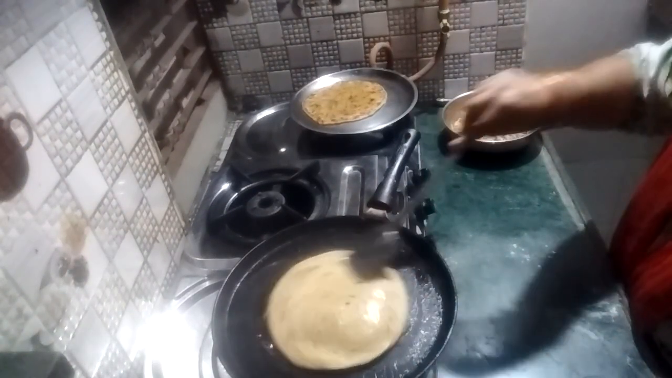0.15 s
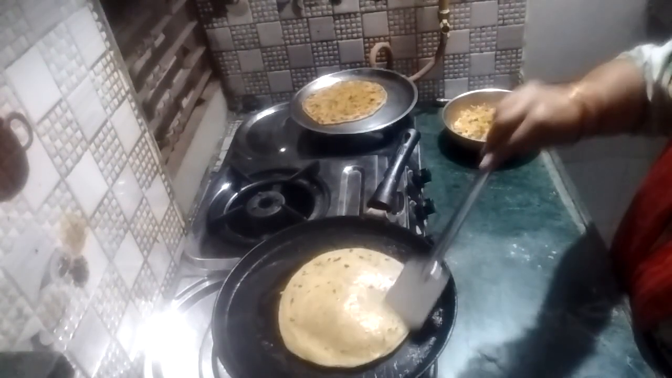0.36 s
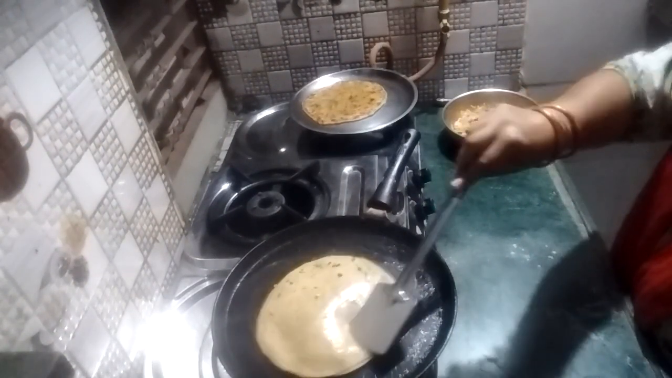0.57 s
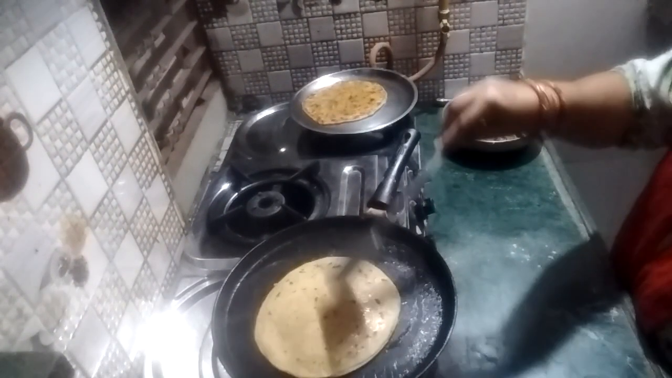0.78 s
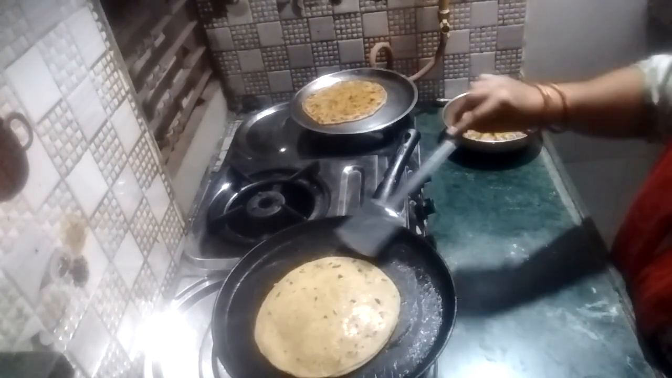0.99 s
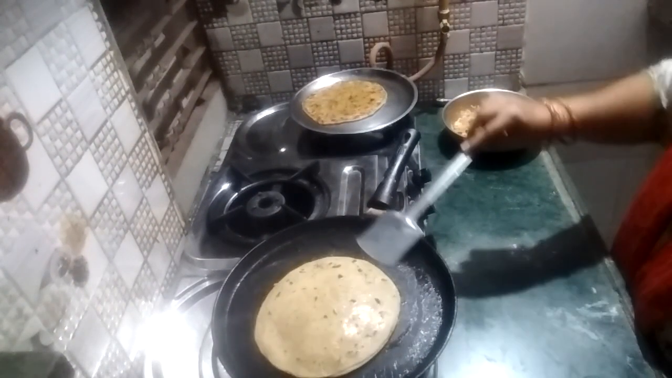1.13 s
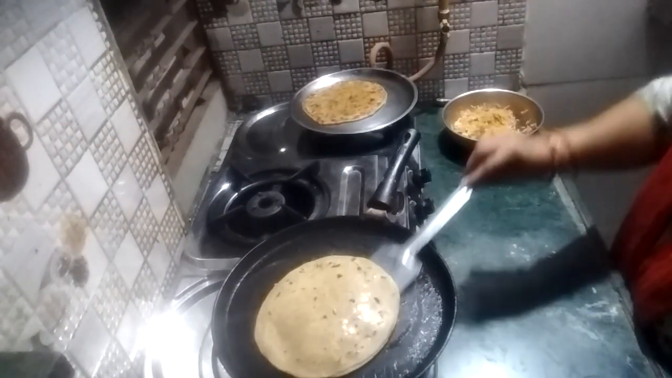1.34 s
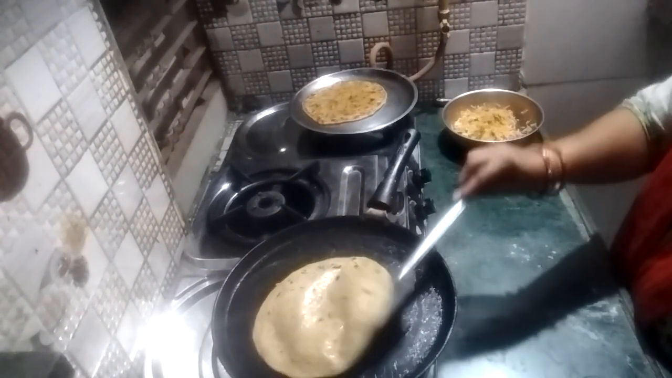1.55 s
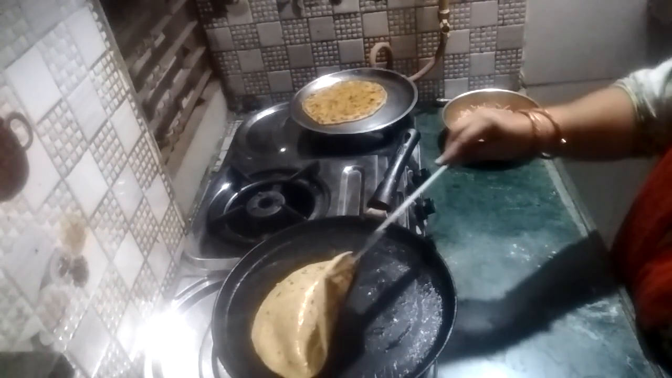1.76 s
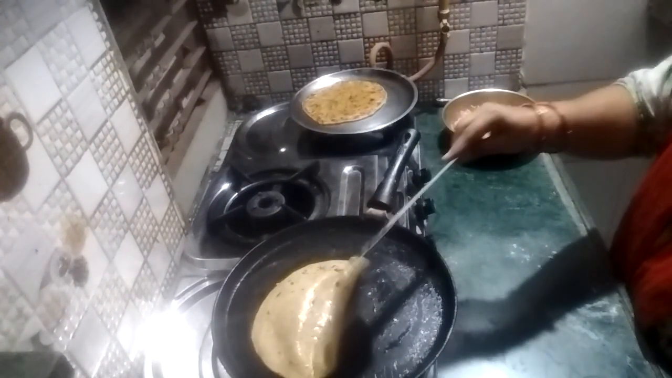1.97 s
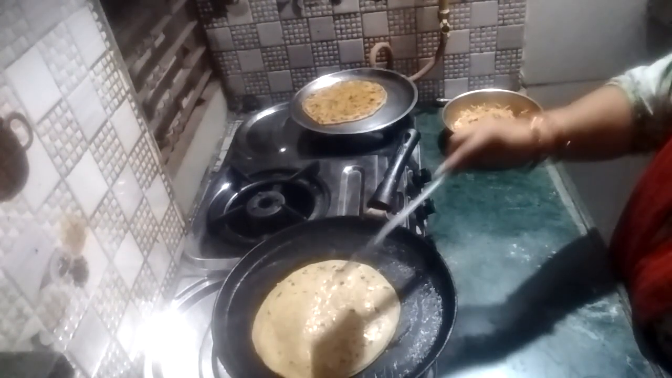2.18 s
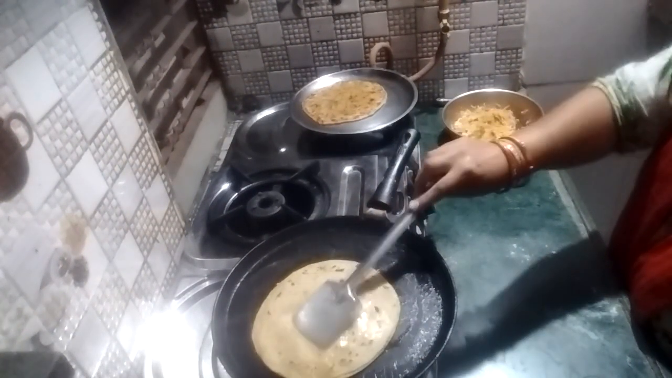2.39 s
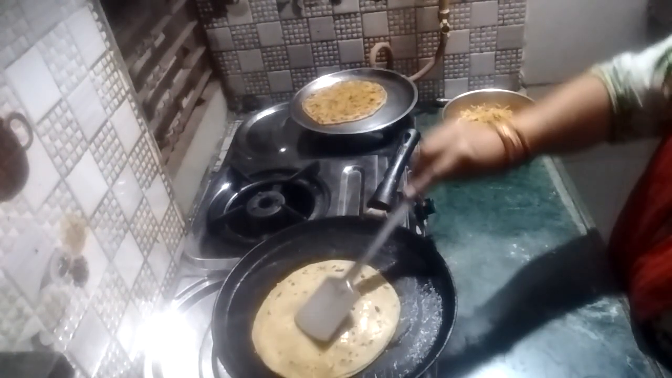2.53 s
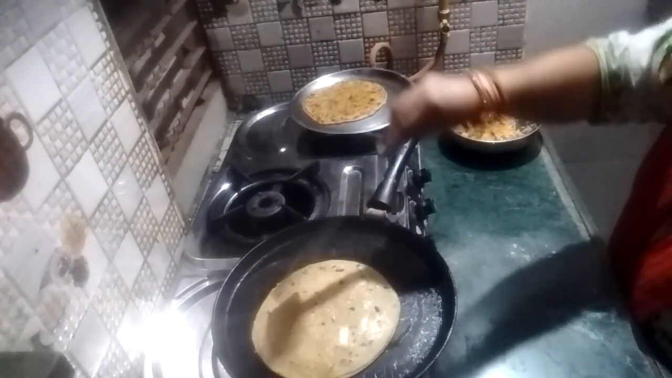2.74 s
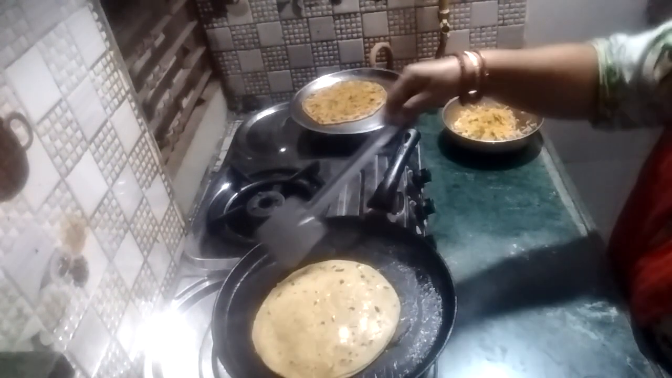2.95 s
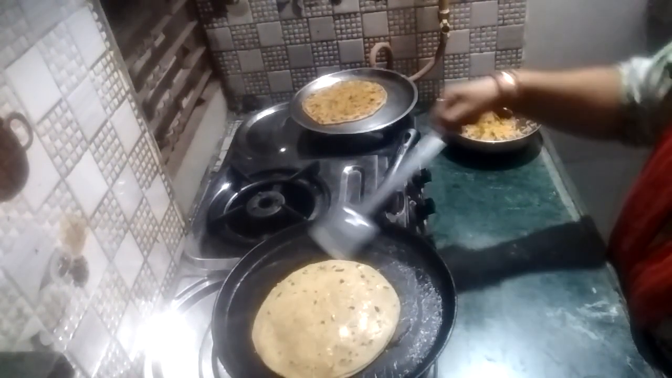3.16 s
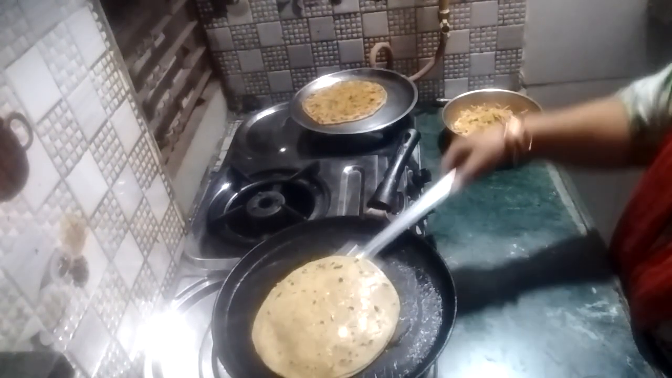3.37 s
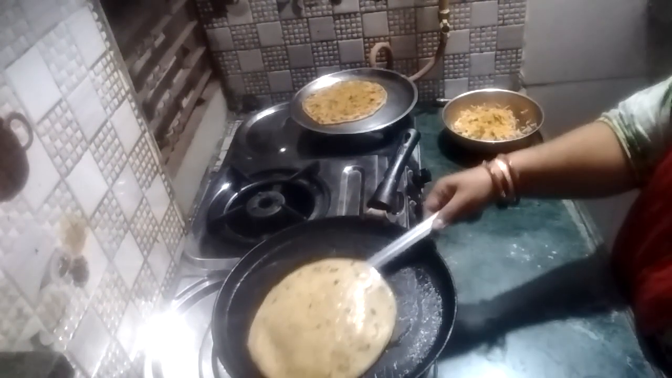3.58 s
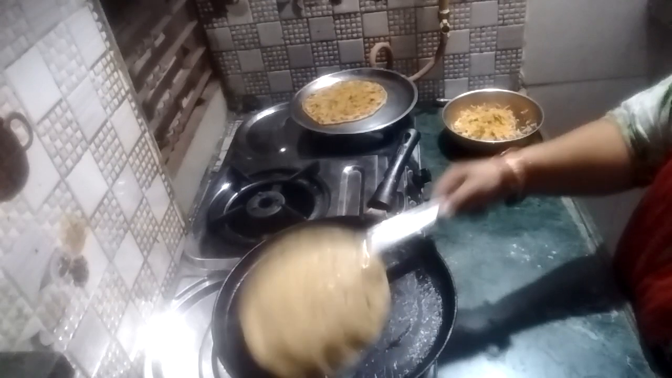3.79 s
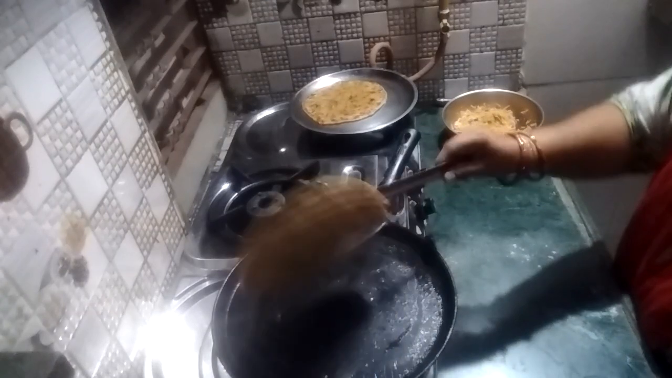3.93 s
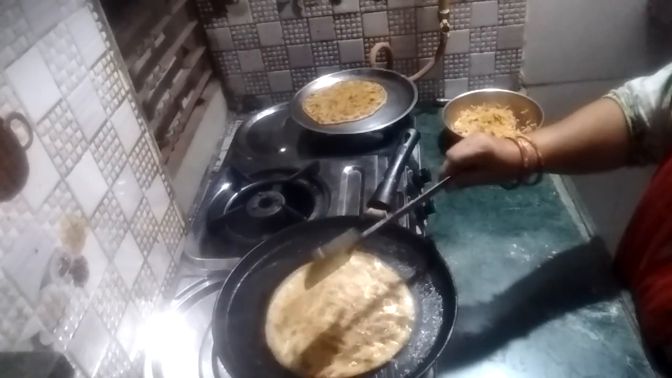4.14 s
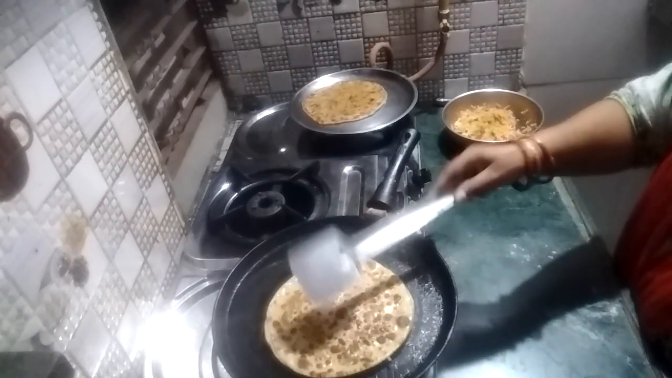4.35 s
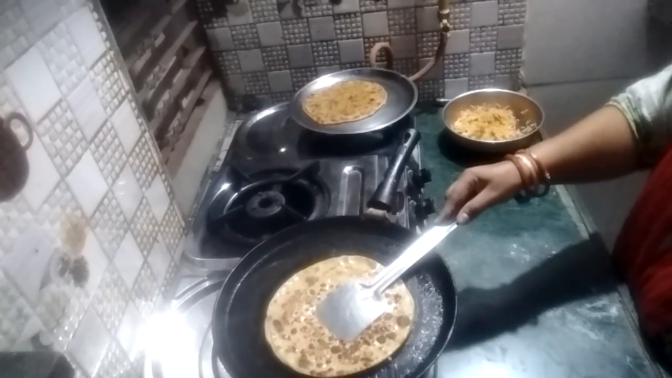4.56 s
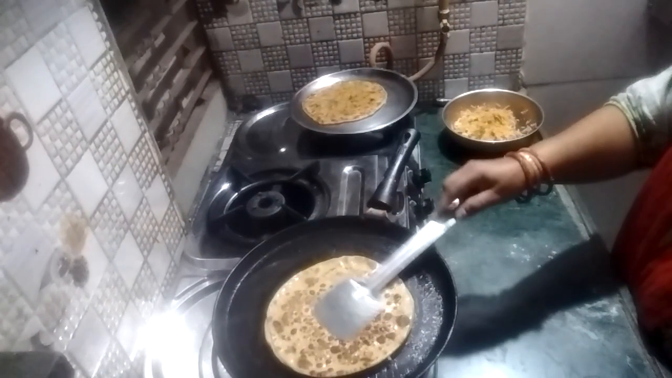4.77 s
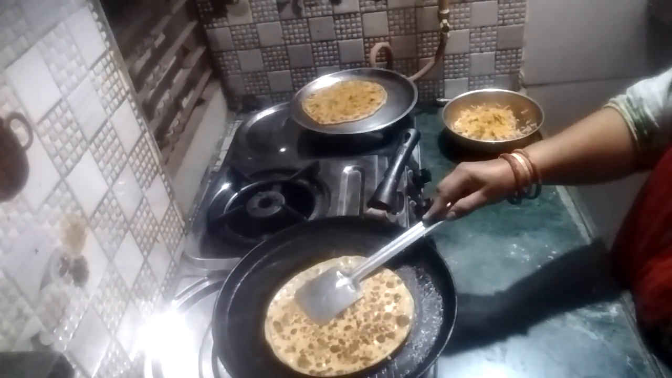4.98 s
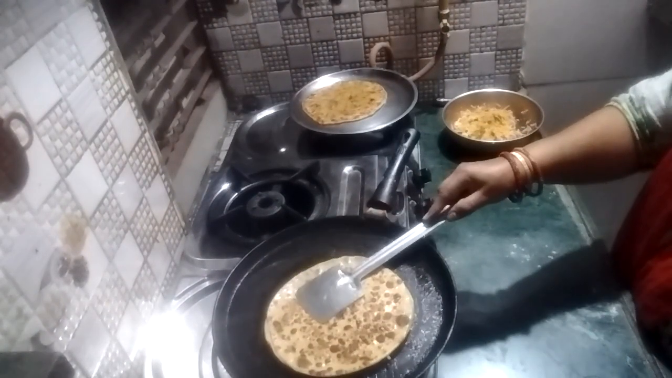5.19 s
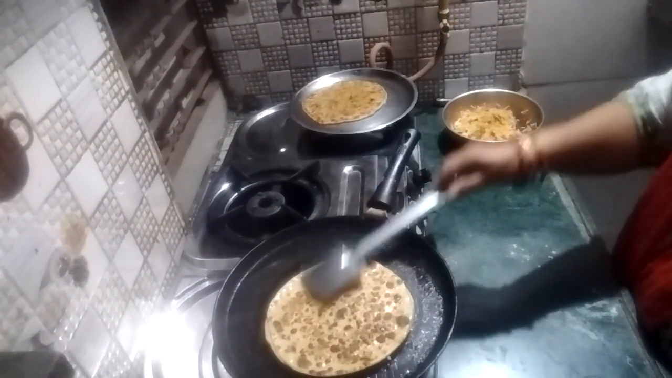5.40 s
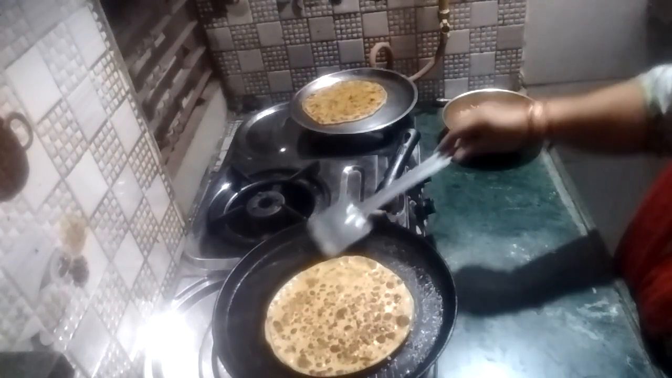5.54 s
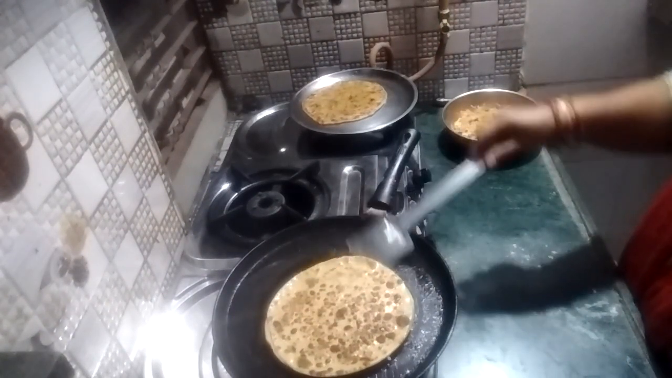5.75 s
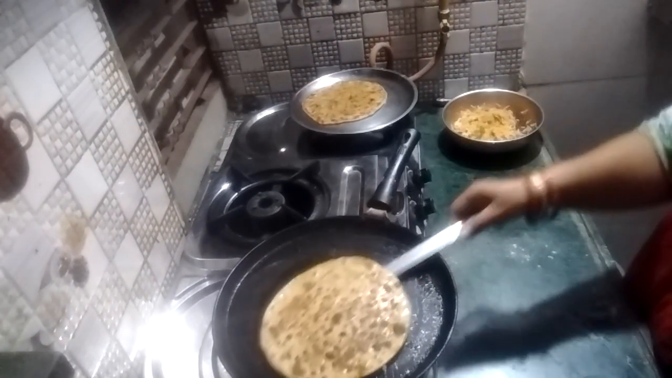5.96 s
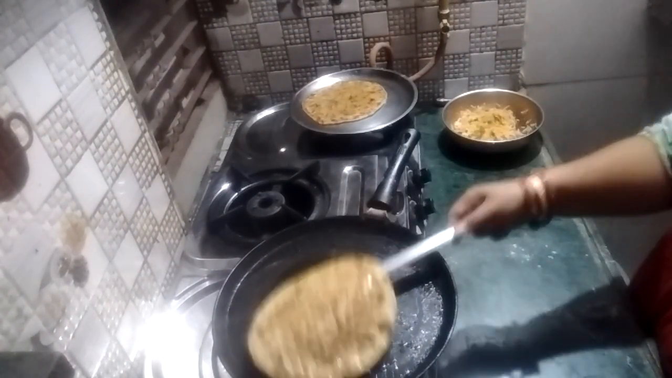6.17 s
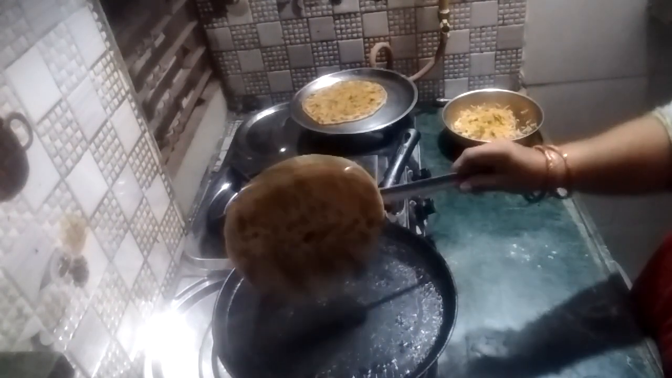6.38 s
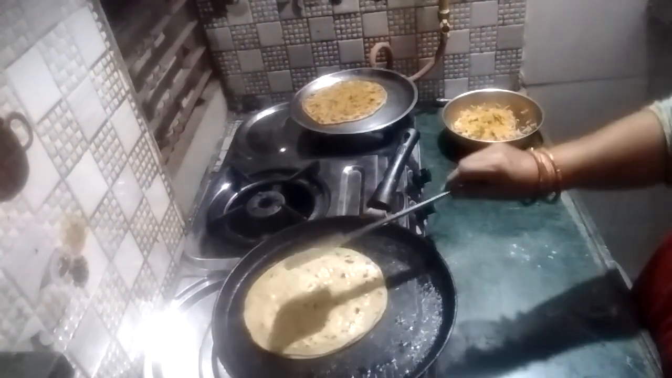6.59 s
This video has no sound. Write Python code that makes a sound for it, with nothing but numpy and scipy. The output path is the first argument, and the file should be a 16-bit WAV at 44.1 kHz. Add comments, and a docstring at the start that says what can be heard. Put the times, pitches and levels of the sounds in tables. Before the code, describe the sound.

Close mono pickup of a griddle in a hard-walled kitchen: thin, high oil crackle over a faint gas rush. Steel taps brightly, rubs with a gliding metallic rasp, and dough drops back with a dull smack and loud oil tick. A big bright sizzle swells midway, then the flipped bread slaps down, fries harder and is patted softly. Final light knocks and scrapes end in near quiet.

```python
"""Oil sizzles and steel knocks lightly: a flatbread fries on a griddle over a gas ring in a tiled kitchen.
A spatula knocks (decaying modes plus noise), scrapes and hums (driven resonances), slides under the bread,
flips it and pats it down (noise smacks, hollow thuds, a low stove thump).
Oil and steam are coloured random clicks that swell with each squeeze and flare at set contacts; drops pop.
The gas flame is a low rush of coloured noise."""
import sys
import numpy as np
from scipy import signal
from scipy.fft import rfft, irfft, next_fast_len
from scipy.io import wavfile

SR = 44100
rng = np.random.default_rng(int(sys.argv[2]) if len(sys.argv) > 2 else 0)


def pcm_store(signal):
    """Save signal as 16-bit PCM."""
    levels = np.round(np.clip(np.atleast_2d(signal), -1, 1) * 32767)
    wavfile.write(sys.argv[1], SR, levels.astype(np.int16).T)


N = 291942
TIME = np.arange(N) / SR

# blade pressing or shifting the bread: start_s, rise_s, hold_s, t60_s, oil_db, steam_db
SQUEEZES = [(0.0, 0.034, 0.0089, 0.47, -51.5, -63), (-.1, 0.13, 0.34, 0.44, -58, -62.5),
            (0.13, 0.12, 0.049, .3, -74, -54.5), (0.493, 0.065, 0.031, .5, -53.5, -63),
            (1.21, 0.32, 0.046, .3, -51, -53.5), (1.544, 0.11, 0.12, 1.6, -50.5, -74),
            (3.25, 0.091, 0.28, .6, -52.5, -56.5), (3.497, 0.15, 0.017, 0.3, -22.5, -60),
            (3.628, 0.091, 0.079, 0.35, -31, -47.5), (3.803, 0.083, .3, 0.17, -58, -87),
            (4.285, 0.044, 0.55, 1.3, -61, -53.5), (4.61, 0.019, 0.018, 0.91, -49.5, -49.5),
            (4.933, 0.02, 0.089, 0.82, -68, -56), (5.447, 0.15, .03, 0.29, -60, -60.5),
            (5.733, 0.042, 0.27, 0.9, -61, -52.5)]
# oil flaring on contact: start_s, level_db, hold_s, t60_s, bubble_pitch_hz
FLARES = [(1.182, -30.5, 0.025, 0.31, 11300), (1.924, -48.5, .012, 0.14, 12000),
          (2.215, -35, 0.03, 0.078, 11100), (2.239, -29, .02, 0.38, 11770), (2.559, -38, 0.014, 0.2, 12400),
          (3.24, -29, 0.037, 0.22, 11000), (3.325, -40, 0.017, 0.057, 12800),
          (4.207, -26.5, 0.019, 0.28, 11300), (4.251, -35, 0.091, 0.3, 11400)]
# single oil drops bursting: start_s, level_db
POPS = [(1.924, -34), (2.285, -14), (3.016, -39), (4.2557, -16), (4.385, -21.5)]
# steel on the griddle: start_s, griddle_db, blade_db, clatter_db, brightness_hz, ring_time_share (left by bread)
KNOCKS = [(0.03, -84, -74, -59.5, 14000, 1), (0.547, -89, -78, -58.5, 11000, 1),
          (1.186, -42, -26.5, -34.5, 15500, 1), (3.244, -31, -44, -34.5, 14000, 1),
          (4.212, -56, -46, -33, 11000, 0.75), (4.747, -42, -62, -31, 2460, 0.58),
          (5.74, -39.5, -47, -40, 12000, 1), (5.755, -41, -46, -42, 11000, 1),
          (5.935, -72, -55, -34, 4600, 0.35)]
# blade strokes, focused on bare metal, broad over bread: start_s, rise_s, hold_s, t60_s, friction_db (untrimmed),
# pitch_hz, glide_hz_per_s, spread_share (of pitch), boost_db
STROKES = [(.08, 0.21, 0.021, 0.39, -50.5, 800, 97, 0.093, -9),
           (0.588, 0.026, .01, .45, -56, 900, 6, .3, 2), (1.221, .19, 0.046, 0.94, -45, 2727, 2, 0.1, 2.5),
           (1.357, 0.065, 0.062, 0.12, -43.5, 1091, -1100, 0.049, 7),
           (1.465, 0.041, 0.052, 0.12, -44.5, 949, -1500, 0.2, 0),
           (2.451, 0.042, 0.58, 0.66, -73.5, 2897, 0, 0.052, 11),
           (3.357, 0.06, 0.026, 0.32, -37.5, 1115, 684, 0.081, 3),
           (3.457, .08, 0.11, 0.22, -39, 1099, 699, 0.047, 0),
           (3.8, 0.055, 0.017, .45, -63.5, 903, -2000, 0.65, 16),
           (4.957, 0.048, 0.015, 0.61, -59.5, 1300, -3, 0.33, 8),
           (5.4, .025, 0.11, 0.29, -54, 1152, 3493, 0.25, 10.5),
           (5.779, 0.097, 0.0186, 0.44, -47, 2065, 5000, 0.18, 6.5),
           (5.78, 0.26, 0.0336, 0.26, -40, 870, 1501.5, 0.12, 7.5),
           (6.08, 0.046, 0.024, 0.39, -52.5, 528.6, -500, 0.14, -6.5)]
# low griddle resonance singing under light contact: middle_s, half_length_s, pitch_hz, level_db
HUMS = [(0.01, 0.12, 780, -63), (0.269, 0.34, 785, -61), (.38, 0.26, 913, -63.5), (0.774, 0.17, 924, -72.5),
        (2.136, 0.073, 928, -70.5), (2.53, 0.18, 648, -64), (2.715, 0.23, 770, -63),
        (3.348, 0.17, 775, -47.5), (4.114, 0.11, 908, -68.5), (4.387, 0.14, 777, -55),
        (4.649, 0.19, 749, -53.5), (5.07, 0.15, 921, -64.5), (6.589, 0.28, 900, -72)]
# dough landing or patted: start_s, smack_db, brightness_hz, thud_db, stove_thump_db
SLAPS = [(2.219, -36.5, 5100, -43, -39.5), (2.251, -40.5, 2920, -51.5, -36.5),
         (2.537, -64.5, 800, -65, -95), (2.618, -59, 1060, -56.5, -82), (2.66, -60.5, 756, -59, -84),
         (3.437, -65, 486, -82, -58), (4.212, -37, 1360, -47.5, -66), (4.258, -50, 1500, -47, -41.5),
         (4.352, -56.5, 1200, -56.5, -49), (4.434, -61, 1200, -63.5, -55), (4.603, -53, 970, -55.5, -55.5),
         (4.759, -43.5, 930, -52, -74), (4.849, -59, 1530, -57, -56), (5.416, -57.5, 1000, -50, -85)]
# ringing modes of the griddle: pitch_hz, level_db, t60_s
GRIDDLE_MODES = [(285, -10, .38), (447, -18, .35), (690, -10, .15), (775, -1, .15), (818, -7, .18),
                 (1050, -8, .25), (1130, -11, .2), (1430, -6, .16), (1698, 0, .2), (1825, -7, .22),
                 (1986, 0, .19), (2735, -3, .14), (3510, -13, .22), (4520, -7, .16), (4947, -11, .18),
                 (5450, -7, .25), (5560, -10, .2), (6772, -13, .22)]
# ringing modes of the spatula: pitch_hz, level_db, t60_s
BLADE_MODES = [(1860, -3, .15), (2848, -5, .17), (3661, -9, .16), (4635, -1, .17), (5720, -11, .13),
               (6255, -15, .2), (6804, -14, .2), (8603, -15, .11), (11370, -14, .18), (12070, -13, .17),
               (12440, -7, .2), (12570, -14, .19)]
# resonances with the blade pressed on the griddle: pitch_hz, width_hz, level_db
RUBBED_MODES = [(286, 26, 0), (502, 11, 4), (772, 27, 4), (970, 15, -1), (1133, 28, -5.5), (1430, 24, 4),
                (1470, 49, -0.5), (1624, 120, -4.5), (1910, 54, 5.5), (2333, 250, 4.5), (2616, 250, 2.5),
                (2672, 66, 8.5), (3510, 480, -1), (4380, 400, -2), (5420, 290, -3)]
# spectrum of bursting oil bubbles: frequency_hz, relative_db_per_hz
OIL_SPECTRUM = [(1000, -41.5), (5000, -21.5), (8000, -16), (9300, -7.5), (10500, -3), (11500, 2),
                (12600, -1.5), (14000, -7.5), (16000, -10)]
# spectrum of escaping steam: frequency_hz, relative_db_per_hz
STEAM_SPECTRUM = [(1500, -9.5), (3000, -28), (4700, -13), (5400, 1.5), (6300, 0.5), (7400, 1), (8100, -3.5),
                  (11000, -4.5), (16000, -24)]
# spectrum of the dense weak modes in a knock: frequency_hz, relative_db_per_hz
CLATTER_SPECTRUM = [(150, -27), (300, -13.5), (600, -13.5), (1000, -2.5), (1800, -10), (2200, -9),
                    (2800, 2), (4000, -5.5), (5500, 1.5), (7400, -2), (8200, -3.5), (16000, -30)]
# spectrum of the blade's rasp: frequency_hz, relative_db_per_hz
FRICTION_SPECTRUM = [(120, -41.5), (300, -7), (600, 2.5), (1000, 6.5), (1800, 9), (2150, -32), (2800, 9),
                     (3500, -16.5), (4800, 2), (5500, 2), (6400, -54), (7400, -68), (8300, -58),
                     (16000, -7)]
# spectrum of the dough's smack: frequency_hz, relative_db_per_hz
DOUGH_SPECTRUM = [(150, -11), (300, -24), (500, -3.5), (700, -2.5), (1200, 1), (2500, -7), (6000, -7.5),
                  (16000, -35)]
# spectrum of the dough's hollow thud: frequency_hz, relative_db_per_hz
THUD_SPECTRUM = [(100, -18), (170, -8.5), (240, -2), (300, 7.5), (440, -1), (600, -13), (1000, -62)]
# spectrum of the gas flame: frequency_hz, relative_db_per_hz
FLAME_SPECTRUM = [(15, -67), (25, -30), (103, 0), (141, -20), (210, -14), (268, -23), (391, -15.5),
                  (446, -25), (488, -18.5), (830, -15.5), (907, -15.5), (1320, -22), (2350, -19.5),
                  (2690, -18), (5000, -20), (6500, -86), (11000, -120)]

# bread frying undisturbed
REST_OIL_DB, REST_STEAM_DB = -59.5, -74.5
# once flipped, its moist side fries harder and slowly dries
FLIP_S, FRESH_OIL_DB, FRESH_STEAM_DB, DRYING_DB_PER_S = 4.21, -53, -66, 1.5
# lifted off, it leaves the oil to calm down
LIFT_S, CALMING_DB_PER_S = 6.143, 34.5
OIL_PEAK_HZ = 11500
SMACK_T60_S = 0.25
STOVE_HZ, STOVE_T60_S = 85.5, 0.22
FLAME_DB = -72
KITCHEN_T60_S = 0.24
MIC_LOW_HZ, CUTOFF_HZ = 42.6, 15850


def frying(flicker_db=1.15):
    """Tiny bubbles burst in the oil, steam hisses out from under the bread; each squeeze feeds both."""
    t = TIME[::50]  # gains need only a coarse grid
    fresh = (t > FLIP_S) * from_db(-DRYING_DB_PER_S * (t - FLIP_S))
    oil_gain = np.hypot(from_db(REST_OIL_DB), from_db(FRESH_OIL_DB) * fresh)
    steam_gain = np.hypot(from_db(REST_STEAM_DB), from_db(FRESH_STEAM_DB) * fresh)
    for start_s, rise_s, hold_s, t60_s, oil_db, steam_db in SQUEEZES:
        push = effort(t - start_s, rise_s, hold_s, t60_s)
        oil_gain = np.hypot(oil_gain, from_db(oil_db) * push)
        steam_gain = np.hypot(steam_gain, from_db(steam_db) * push)
    # bubbles from the bread's two edges take different paths through the room
    bubbles = sum(kitchen(grains(3000, spread_db=5.3), wet_db=8) for _ in range(2))
    crackle = colour(bubbles, OIL_SPECTRUM) * from_db(flicker_db * drift(90))
    steam = colour(kitchen(grains(9000, spread_db=3.0), wet_db=-7.5), STEAM_SPECTRUM)
    calm = from_db(-CALMING_DB_PER_S * np.maximum(t - LIFT_S, 0))
    oil_layer = np.interp(TIME, t, calm * oil_gain) * crackle
    steam_layer = np.interp(TIME, t, calm * steam_gain) * steam
    return oil_layer + steam_layer


def flares(rise_s=0.005):
    """Moisture pressed onto hot metal boils off in a burst; finer bubbles sound higher."""
    out, t = np.zeros(N), TIME[:SR // 2]
    bubbles = kitchen(grains(5000, spread_db=2.0), wet_db=-16)
    swell = np.minimum(t / rise_s, 1)
    for start_s, level_db, hold_s, t60_s, pitch_hz in FLARES:
        spectrum = np.array(OIL_SPECTRUM) * [pitch_hz / OIL_PEAK_HZ, 1]
        spit = colour(bubbles[int(start_s * SR):][:len(t)], spectrum)
        add(out, start_s, from_db(level_db) * spit * swell * fade(t - hold_s, t60_s))
    return out


def pops(pitch_hz=11500, width_hz=3500):
    """A larger drop bursts with one sharp tick."""
    clicks = np.zeros(N)
    for start_s, level_db in POPS:
        add(clicks, start_s, from_db([level_db]))
    ticks = resonate(clicks + 1e-18, pitch_hz, width_hz)
    # the loudest tick keeps the peak of the loudest click
    return kitchen(ticks * clicks.max() / np.abs(ticks).max(), wet_db=-16.0)


def knocks(clatter_t60_s=0.32, chatter_s=0.003, rise_s=0.003, body_db=-2):
    """Steel chatters briefly on the griddle: both ring unsteadily, over a wash of dense weak modes."""
    out, t = np.zeros(N), TIME[:SR * 3 // 4]
    for start_s, griddle_db, blade_db, clatter_db, bright_hz, free in KNOCKS:
        wash = colour(rng.standard_normal(len(t)), CLATTER_SPECTRUM)
        wash = wash + from_db(body_db) * pressed(rng.standard_normal(len(t)))
        clatter = from_db(clatter_db) * rms_one(wash) * fade(t - chatter_s, clatter_t60_s * free)
        griddle = from_db(griddle_db) * struck(np.array(GRIDDLE_MODES) * [1, 1, free], t, vary_db=1.0)
        blade = from_db(blade_db) * struck(BLADE_MODES, t, vary_db=1.0)
        ring = (griddle + blade) * (1 + .25 * drift(110)[:len(t)])
        blow = (ring + clatter) * (1 - np.exp(-t / rise_s))
        # bread between blade and griddle cushions the blow
        add(out, start_s, soften(soften(blow, bright_hz), bright_hz))
    return out


def scrapes(body_db=-1, rasp_db=-3, coupling=0.79, judder_db=1.04, trim_db=-3.0):
    """Tiny slips excite the griddle; the pitch range the moving blade favours glides across resonances."""
    out, t = np.zeros(N), TIME[:SR * 3 // 4]
    slips = kitchen(grains(900, spread_db=3.0), wet_db=0.0)
    rasp = from_db(body_db) * pressed(slips) + from_db(rasp_db) * colour(slips[::-1], FRICTION_SPECTRUM)
    for start_s, rise_s, hold_s, t60_s, friction_db, pitch_hz, glide, spread, boost_db in STROKES:
        # a band of slips rides on the favoured pitch
        path_hz = pitch_hz + glide * np.minimum(t, rise_s + hold_s)
        carrier = np.sin(2 * np.pi * np.cumsum(path_hz) / SR)
        band = rms_one(soften(rng.standard_normal(len(t)), spread * pitch_hz) * carrier)
        favoured = rms_one(band + coupling * pressed(band))
        boost = from_db(boost_db)
        sound = np.roll(rasp, -int(start_s * SR))[:len(t)] + boost * favoured
        push = effort(t, rise_s, hold_s, t60_s)
        add(out, start_s, from_db(friction_db) * push * sound / np.hypot(1, boost))
    return from_db(trim_db + judder_db * drift(35)) * out


def hums(width_hz=24, rough=0.62):
    """Gentle rubbing keeps one narrow resonance wavering; it swells and dies away."""
    out = np.zeros(N)
    for middle_s, half_s, pitch_hz, level_db in HUMS:
        near = np.abs(TIME - middle_s) < half_s
        t = TIME[near] - middle_s
        waver = [rms_one(soften(rng.standard_normal(SR), width_hz))[-len(t):] for _ in range(2)]
        phase = 2 * np.pi * pitch_hz * t
        tone = (1 + rough * waver[0]) * np.sin(phase) + rough * waver[1] * np.cos(phase)
        swell = np.cos(np.pi * t / (2 * half_s)) ** 4
        out[near] += from_db(level_db) * swell * tone / np.hypot(1, rough)
    return out


def slaps(spread_s=0.011, rise_s=0.0008, body_db=-3, thud_t60_s=0.35):
    """Dough lands patch by patch with a smack and a hollow thud; the griddle rocks on the stove."""
    out, t = np.zeros(N), TIME[:SR * 3 // 4]
    for start_s, smack_db, bright_hz, thud_db, thump_db in SLAPS:
        noise = rng.standard_normal((3, len(t)))
        smack = colour(noise[0], DOUGH_SPECTRUM) + from_db(body_db) * pressed(noise[1])
        smack = rms_one(soften(smack, bright_hz))
        smack = from_db(smack_db) * smack * fade(t - spread_s, SMACK_T60_S)
        thud = from_db(thud_db) * colour(noise[2], THUD_SPECTRUM) * fade(t - spread_s, thud_t60_s)
        thump = from_db(thump_db) * np.sin(2 * np.pi * STOVE_HZ * t) * fade(t, STOVE_T60_S)
        add(out, start_s, (smack + thud + thump) * (1 - np.exp(-t / rise_s)))
    return out


def gas_flame():
    """The burning gas rushes steadily: noise weighted to the bass."""
    return from_db(FLAME_DB) * colour(rng.standard_normal(N), FLAME_SPECTRUM)


def kitchen(x, wet_db):
    """Close tiled walls add a dense short tail; the gain is set to hold the power."""
    t = TIME[:SR // 2]
    tail = rng.standard_normal(len(t)) * fade(t, KITCHEN_T60_S) * (t > .003)
    wet = from_db(wet_db)
    echo = signal.fftconvolve(x, tail / np.linalg.norm(tail))[:N]
    return (x + wet * echo) / np.hypot(1, wet)


def pressed(push):
    """Resonances of the loaded griddle, in parallel with alternating sign; rms 1."""
    modes = enumerate(RUBBED_MODES)
    return rms_one(sum((-1) ** k * from_db(db) * resonate(push, hz, width) for k, (hz, width, db) in modes))


def struck(modes, t, vary_db):
    """Every blow rings each mode with a strength of its own; low modes swell more slowly."""
    hz, db, t60_s = np.transpose(modes)[:, :, None]
    strength = from_db(db + vary_db * rng.standard_normal(hz.shape))
    swell = 1 - np.exp(-t * hz / 1.7)
    tone = np.sin(2 * np.pi * (hz * t + rng.random(hz.shape)))
    return np.sum(strength * swell * fade(t, t60_s) * tone, axis=0)


def effort(t, rise_s, hold_s, t60_s):
    """A push of the hand builds up, holds and lets go."""
    return np.clip(t / max(rise_s, .001), 0, 1) ** 2 * fade(t - rise_s - hold_s, t60_s)


def grains(per_s, spread_db):
    """Random clicks of very unequal size and random sign."""
    sizes = from_db(spread_db * np.minimum(rng.exponential(1, N), 5)) * rng.choice([-1, 1], N)
    return sizes * (rng.random(N) < per_s / SR)


def resonate(x, hz, width_hz):
    """One resonance with gain 1 on top."""
    r = np.exp(-np.pi * width_hz / SR)
    feedback = [1, -2 * r * np.cos(2 * np.pi * hz / SR), r * r]
    return signal.lfilter(np.array([1, 0, -1]) * (1 - r * r) / 2, feedback, x)


def colour(x, spectrum):
    """Give a steady signal a spectrum, with falling skirts outside the table; rms 1."""
    hz, db = np.transpose(spectrum)
    size = next_fast_len(len(x))
    f = np.maximum(np.fft.rfftfreq(size, 1 / SR), 1)
    skirts = np.minimum(f / hz[0], 1) ** 2 * np.minimum(hz[-1] / f, 1) ** 2
    gain = skirts * from_db(np.interp(np.log(f), np.log(hz), db))
    return rms_one(irfft(rfft(x, size) * gain, size)[:len(x)])


def soften(x, hz):
    """A softer contact loses its treble: second-order low-pass."""
    return signal.sosfilt(signal.butter(2, min(hz, .45 * SR), fs=SR, output="sos"), x)


def drift(rate_hz):
    """Random values, spread near 1, joined by straight lines."""
    return np.interp(TIME * rate_hz, np.arange(4000), rng.standard_normal(4000))


def fade(t, t60_s):
    """Exponential decay by 60 dB in t60_s, from time 0."""
    return np.exp(-np.log(1000) * np.maximum(t, 0) / t60_s)


def from_db(db):
    """Decibels to gain."""
    return 10 ** (np.asarray(db) / 20)


def rms_one(x):
    """Scale to unit power."""
    return x / np.sqrt(np.mean(x ** 2) + 1e-20)


def add(out, start_s, sound):
    """Mix a sound in at start_s."""
    i = max(int(start_s * SR), 0)
    out[i:i + len(sound)] += sound[:N - i]


def scene():
    """Oil, spatula and bread over the low rush of the gas flame."""
    oil = frying() + flares() + pops()
    steel = knocks() + scrapes() + hums()
    return (oil + steel + slaps() + gas_flame())[None]


def record(dry):
    """A small microphone sheds the deepest bass; the top is cut steeply."""
    thin = signal.sosfilt(signal.butter(2, MIC_LOW_HZ, "high", fs=SR, output="sos"), dry)
    return signal.sosfilt(signal.ellip(12, .1, 80, CUTOFF_HZ, fs=SR, output="sos"), thin)


dry = scene()
out = record(dry)
pcm_store(out)
```